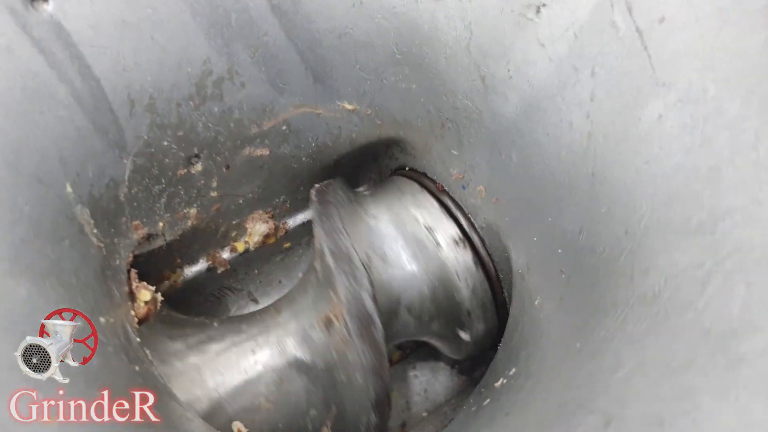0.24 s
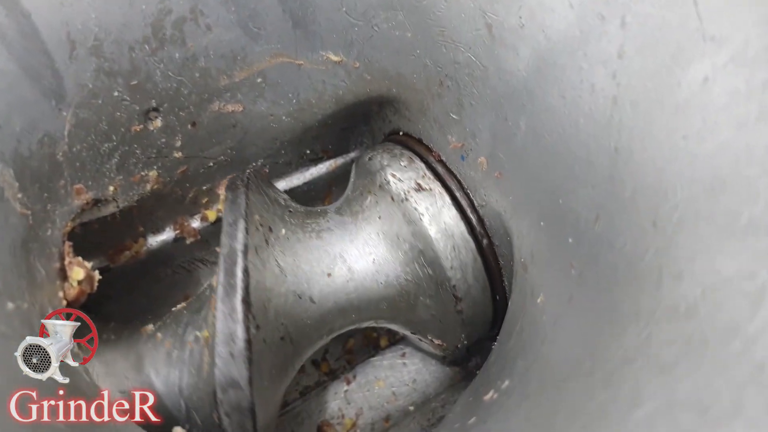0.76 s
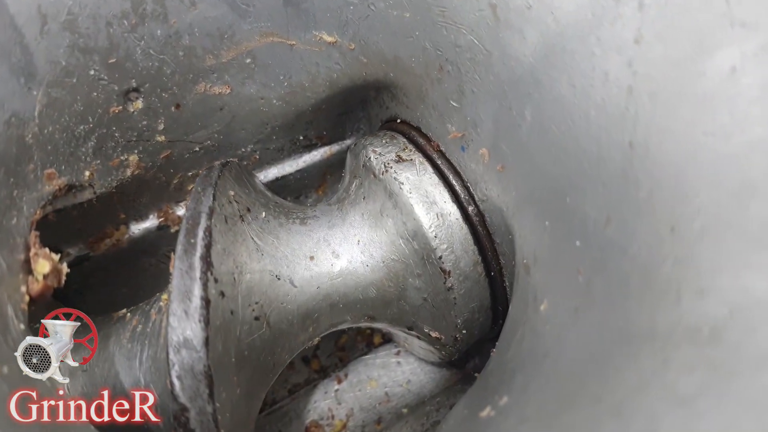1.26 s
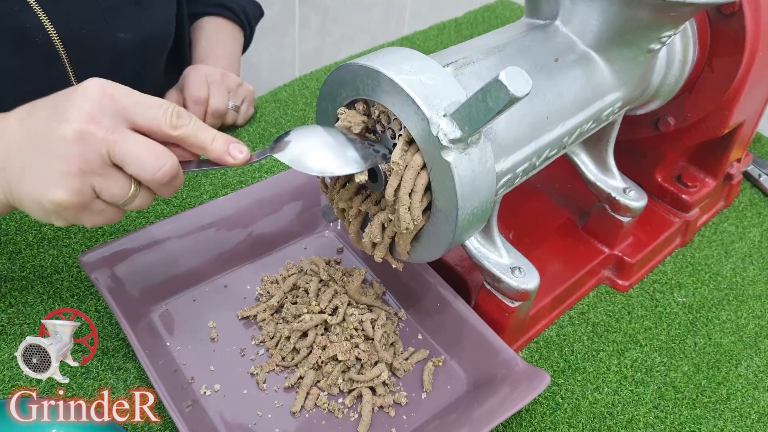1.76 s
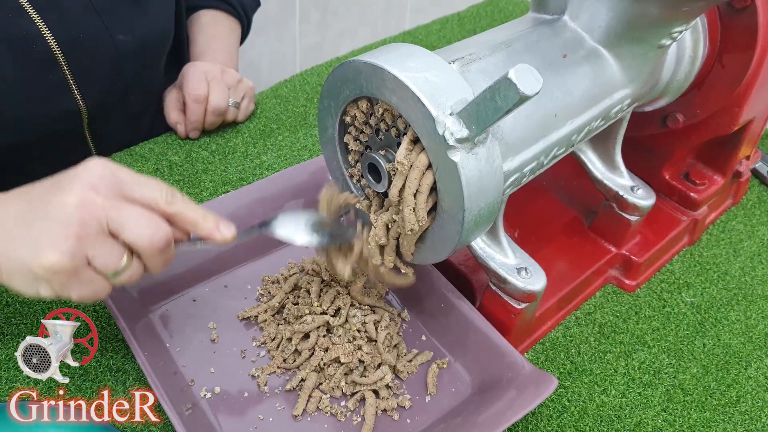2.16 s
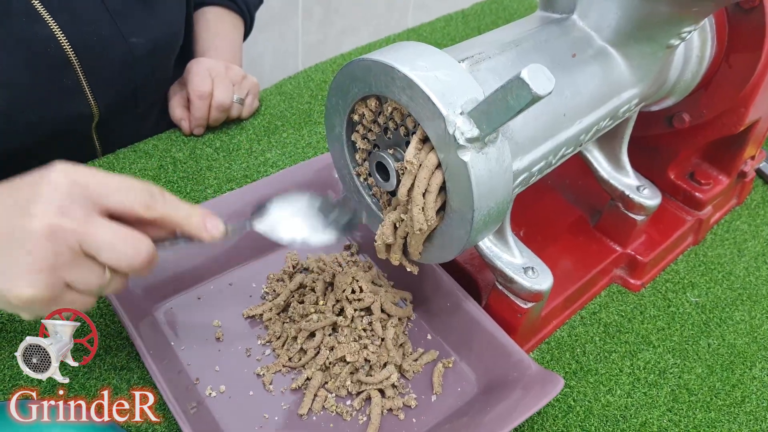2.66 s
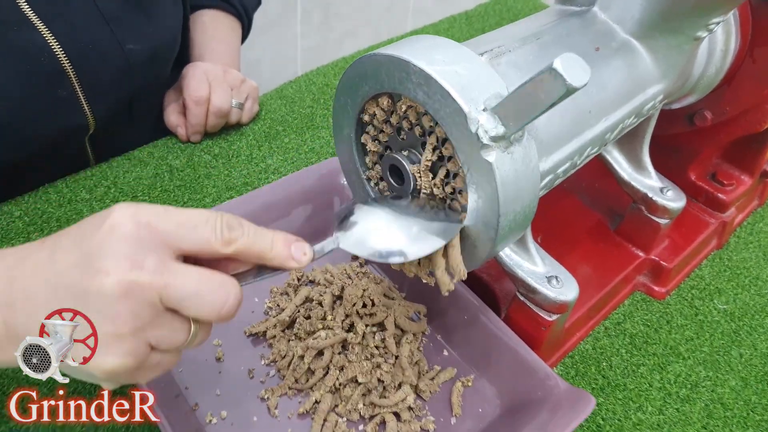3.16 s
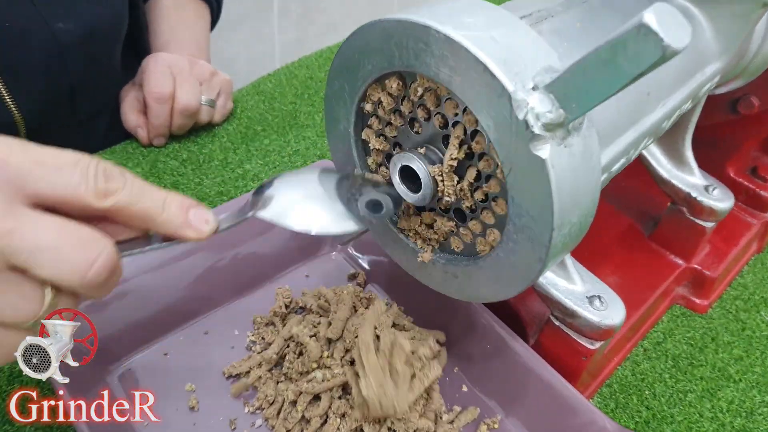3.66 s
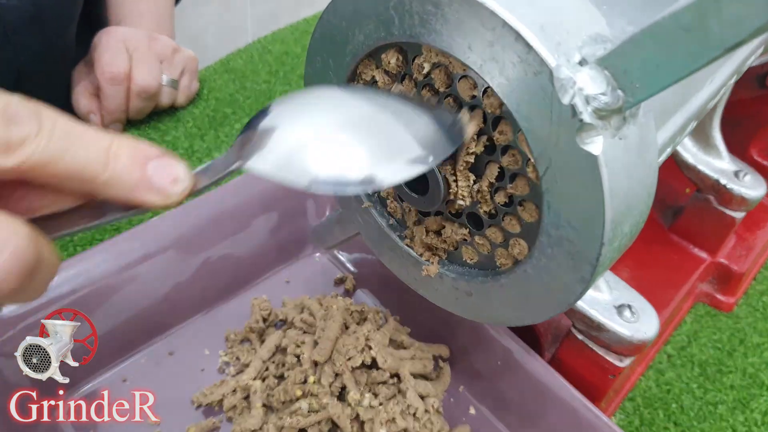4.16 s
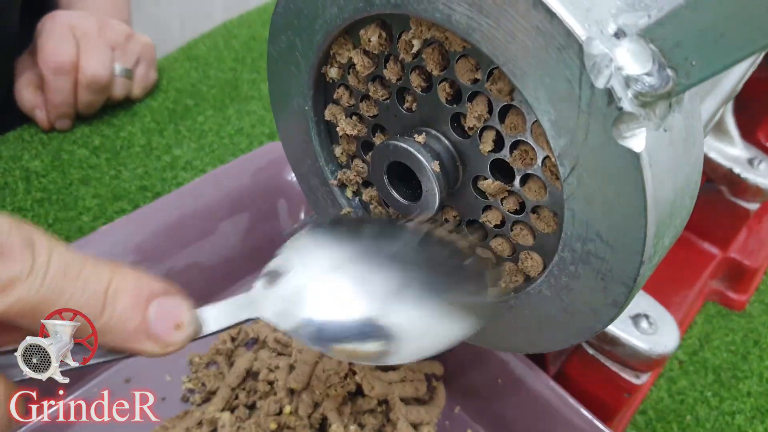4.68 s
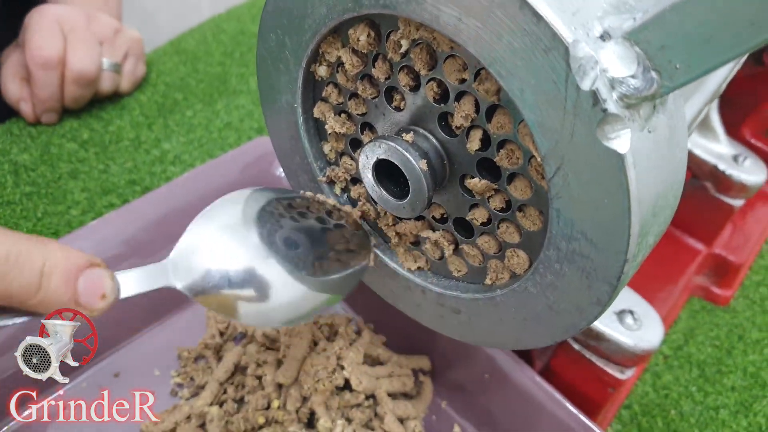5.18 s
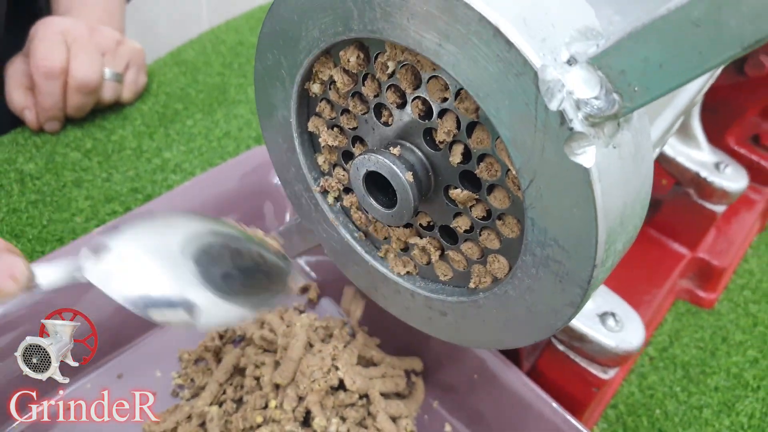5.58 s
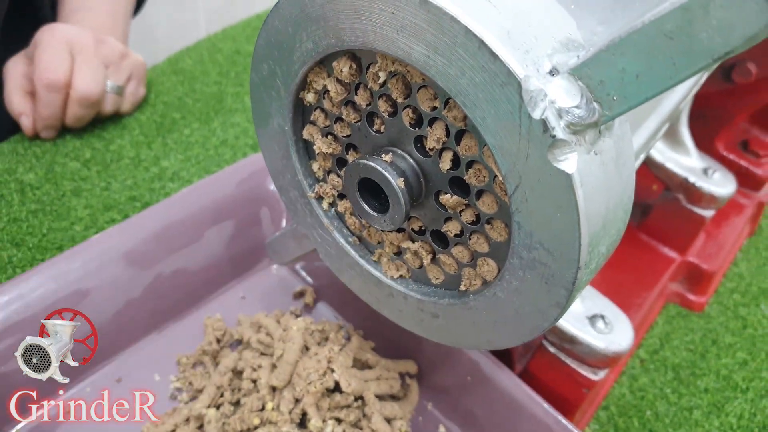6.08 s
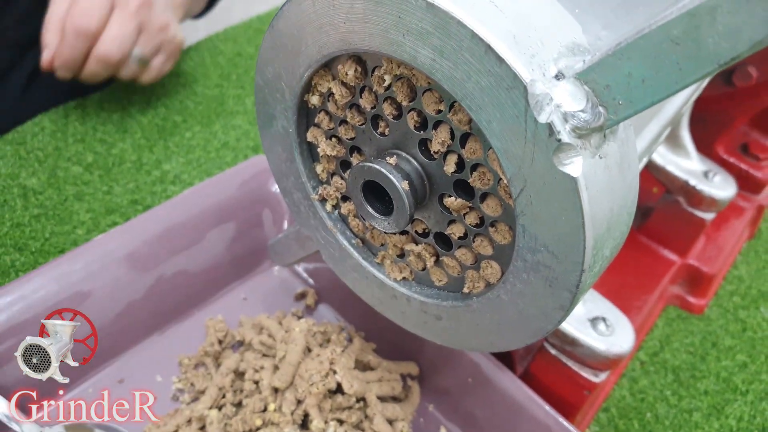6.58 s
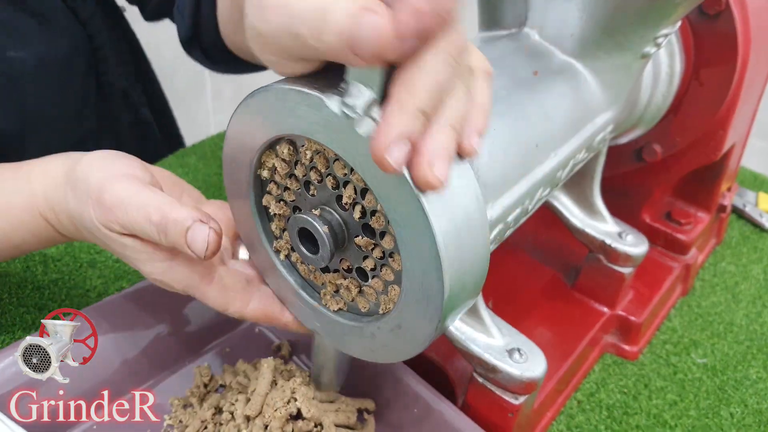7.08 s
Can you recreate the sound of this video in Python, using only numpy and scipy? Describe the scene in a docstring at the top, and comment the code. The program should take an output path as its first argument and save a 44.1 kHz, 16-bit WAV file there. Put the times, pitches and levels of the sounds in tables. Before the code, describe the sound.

Close stereo sound in a reverberant workshop, with faint steady air throughout. At 0 s a grinder's throbbing low hum and metallic rumble are running; a sharp clank at 0.2 s makes it bind louder, then from about 0.6 s the drive dies away, rubbing first, nearly silent by 1.5 s, where a tiny microphone click falls. An abrupt cut at 1.6 s starts a spoon on a steel plate: irregular gritty scrapes and bright ticks until 5.5 s, strongest at 2.5 and 4.35 s, the latter with a microphone thump. Low frame knocks follow some touches; from 4.5 s it sounds closer and drier. Soft sleeve rustling fills 6 to 6.6 s. At 6.57 s a hard double blow clangs brightly and chatters. After a cut at 6.78 s come dull booms, then a solid knock near 7.05 s and even, low thread grinding with hissing hand friction to the end.

```python
"""Meat grinder in a live workshop

Three abrupt shots: a cast-iron grinder's auger rumbles, clanks and runs down (hum, coloured grit, struck modes);
a spoon scrapes mince off the steel plate (bursts and strokes of grit) and the locking ring is struck loose (modes);
the ring is unscrewed (even grit under a juddering hiss of the hand).
Booms of the frame, soft rubs and sleeve sweeps, microphone bumps and air run across the cuts."""
import sys
import numpy as np
from scipy import signal
from scipy.fft import rfft, irfft, next_fast_len
from scipy.io import wavfile

SR = 44100
rng = np.random.default_rng(int(sys.argv[2]) if len(sys.argv) > 2 else 0)


def unload_wav(signal):
    """Save mono or channel-first audio to the path in sys.argv[1] as 16-bit WAV at rate SR, clipped to [-1, 1]."""
    wavfile.write(
        sys.argv[1],
        SR,
        np.round(np.clip(np.atleast_2d(signal).T, -1, 1) * 32767).astype(np.int16),
    )


N = 323253
T = np.arange(N) / SR


# auger hitting the barrel: (time [s], level [dB re clank_db], slide [ms])
CLANKS = [(0.182, -21.5, 3.2), (0.193, -16, 3), (0.203, -6.5, 0.92), (0.208, -10.5, 5.6),
          (0.354, -26.5, 2.2), (0.561, -23, 1.06)]
# screw modes: (frequency [Hz], t60 [s], relative level [dB], left minus right [dB])
AUGER_MODES = [(1130, 0.29, -9, 0), (1180, 0.89, -14.5, 0), (1986, 0.28, -22.5, -10),
               (2780, 0.032, -20.5, -16), (2977, 0.17, -13.5, 3), (5540, 0.046, -11.5, -1.5),
               (6560, .03, -1, -26), (6534, 0.07, -2, -20), (7320, 0.066, -19, -21.5), (6760, .02, -2, -9),
               (8350, 0.023, -10.5, -11), (9300, 0.09, -6.5, 8.5), (11750, 0.073, -5.5, -4),
               (12890, .1, -3.5, -7), (13400, 0.076, -3.5, -17.5), (16500, .02, -6, -7.5)]
# auger binding in the barrel and working free: (time [s], extra load [dB re running load])
BINDS = [(0.215, 4), (0.58, -11)]
BIND_ATTACK_S, BIND_RELEASE_S = 0.025, 0.2
# rumble spectrum: (frequency [Hz], level [dB])
RUMBLE_COLOUR = [(60, -10), (150, -12), (210, 4), (275, -9), (333, 9), (400, -11.5), (470, -5.5),
                 (570, -19), (700, -13), (1000, -26), (1600, -39), (4000, -34.5)]
# levels at full speed and running load; the rub level is that of the force before its filters
RUMBLE_DB, RUB_FORCE_DB = -32, -42.5
RUMBLE_POWER, RUB_POWER = 1.7, 3.2  # exponents of speed: rubbing dies first


def auger(walls, wet_db=-3, whine_db=-3, clank_db=1):
    """The screw rumbles in the barrel, rubs on it and clanks against it; binding makes it louder."""
    load = 1
    for s, db in BINDS:
        load = load + undb(db) * envelope(s, s + BIND_ATTACK_S, BIND_ATTACK_S, BIND_RELEASE_S)
    rumble = unit_rms(colour(grit(N, 2, alike=0.75), RUMBLE_COLOUR))
    rumble = rumble * undb(RUMBLE_DB) * load * speed() ** RUMBLE_POWER
    # rubbing is a softer contact than a clank: less treble
    rub_colour = [(1200, -0.5), (2000, 8), (3000, 4.5), (6500, -4.5), (9000, -15.5), (14000, -13)]
    force = colour(grit(N, 5.7) * judder(70, 3.3), rub_colour)
    force = force * undb(RUB_FORCE_DB) * load * speed() ** RUB_POWER
    # steady rubbing favours the two lowest modes
    whine = undb(whine_db) * through(force[0], body(AUGER_MODES[:2], blur=0.015))
    for s, db, slide_ms in CLANKS:
        add(force, s - 1 / 20, sized(contact(slide_ms), db + clank_db, slide_ms))
    metal = through(force, body(AUGER_MODES, crack_db=-17, crack_s=0.01, blur=0.022)) + whine
    # weak between its modes
    metal = colour(metal, [(700, -5), (1150, -2.5), (1600, -10), (2000, 0), (3000, 5), (4200, -3.5), (5500, 0.5)])
    return hum() + rumble * pan(-1.3) + metal + undb(wet_db) * through(metal, walls)


HUM_DB, HUM_POWER = -28.5, 0.96  # level at the start; exponent of speed
HUM_SAG_DB_PER_S = 7.5  # until switch-off


def hum(low_hz=103.9, high_hz=119.6, low_db=-5):
    """Two close notes of the frame throb against each other and fade with the drive."""
    pair = np.cos(2 * np.pi * high_hz * T) + undb(low_db) * np.cos(2 * np.pi * low_hz * T)
    sagging_db = HUM_DB - HUM_SAG_DB_PER_S * np.minimum(T, SWITCH_OFF_S)
    level = undb(sagging_db) * speed() ** HUM_POWER
    return unit_rms(pair * judder(19, 2.9)) * level * pan(-4.5)


SWITCH_OFF_S, COAST_S = 0.59, 0.26  # drive off; time constant of its speed


def speed():
    """Speed of the drive as a share of full speed, decaying exponentially after switch-off."""
    return np.exp(-np.maximum(T - SWITCH_OFF_S, 0) / COAST_S)


# ticks and skids on the plate: (time [s], slide [ms], level [dB], resonance [Hz], brightness [dB])
TOUCHES = [(1.662, 0.26, -24, 2550, -4.5), (1.704, 11.3, -17.5, 3000, -1.5), (1.735, 7.6, -26, 2600, 2),
           (2.041, 22.5, -28.5, 3570, 3), (2.064, 2.2, -23, 2980, 6.5), (2.092, 7.8, -23, 2680, 1),
           (2.486, 2.7, -22.5, 3060, 1), (2.498, 0.81, -14.5, 2540, -3.5), (2.543, 0.11, 2, 4250, 7),
           (2.906, 2.2, -21.5, 3200, 1), (2.921, 1.7, -22, 2880, 1), (3.02, 0.81, -25.5, 3010, -5.5),
           (3.14, 19, -20.5, 5530, 0), (3.389, 1.2, -16.5, 3660, -4), (3.399, 3.7, -22.5, 3630, -2),
           (3.432, 1.8, -18, 2800, 0.5), (3.438, 0.86, -17, 4020, -2.5), (3.527, 1, -16, 4000, 0),
           (3.741, 0.61, -15, 3320, -1), (3.826, 1.9, -16.5, 2530, -9.5), (3.904, 7, -27, 4220, 1),
           (4.236, 1.04, -7, 5530, 3.5), (4.301, 0.26, -16.5, 5400, -6.5), (4.315, 3.7, -15, 5490, -0.5),
           (4.354, 0.46, 4, 5130, 9.5), (4.389, 4.9, -15.5, 3500, 5), (4.637, 1.76, -10.5, 3800, -2),
           (4.713, 7.9, -15, 3510, 1.5), (4.986, 1.9, -16, 2520, -5.5), (5.068, 1.4, -12.5, 4000, -1),
           (5.163, 13, -25, 2580, -0.5), (5.443, 0.96, -12.5, 6480, 0.5), (5.517, 5.4, -22.5, 2750, -1.5)]
# at brightness 0; brightness takes from the bass what it gives the treble
TOUCH_BASS_DB, TOUCH_TREBLE_DB = -2, -3
# spoon on plate: (frequency [Hz], level [dB])
SPOON_COLOUR = [(60, -42), (200, -13.5), (600, -6.5), (1100, -5), (1800, -3), (3000, 2), (4500, -2),
                (5600, -1), (7300, -3.5), (8500, -6), (13000, -3), (16000, 1.5)]
# bowl of the spoon: (frequency [Hz], t60 [s], relative level [dB], left minus right [dB])
SPOON_MODES = [(5470, 0.3, -2, -6), (7480, 0.31, -5, -3.5)]
# frame, undamped: (frequency [Hz], t60 [s], relative level [dB], left minus right [dB])
FRAME = [(100, 1.7, -10.5, -5.5), (116, 0.88, -2, -6.5), (153.6, 1.1, -7.5, -6), (209, 2.1, -2.5, -6),
         (227.8, 0.69, -3, -5), (309.4, 2, -4.5, -2.5), (343.6, 2.4, 1.5, -13.5), (358, 0.85, 0.5, -5),
         (403, 0.55, -10, 0.5), (459.4, 0.92, -5, 4.5)]
SPOON_PAN_DB, SPOON_LAG_MS = -5, 0.11  # left minus right; right is late
# the microphone creeps closer, so less room and frame are heard
APPROACH_START_S, APPROACH_END_S = 4.47, 4.67
SPREAD_FAR_DB, SPREAD_NEAR_DB = -6, -13.5


def spoon(walls, frame_db=-4, ring_db=-17, damping=0.71):
    """Ticks and short skids joined by gritty strokes; where the spoon touches decides its resonance."""
    steel = strokes()
    for s, slide_ms, db, hz, bright_db in TOUCHES:
        burst = colour(contact(slide_ms), SPOON_COLOUR)
        burst = colour(burst, [(900, TOUCH_BASS_DB), (2000, 0), (6500, 0), (10000, TOUCH_TREBLE_DB)])
        burst = resonate(brighten(burst, bright_db), hz, width_hz=700, db=3)
        add(steel, s - 1 / 20, sized(burst, db, slide_ms))
    late_right = np.roll(steel[1], round(SPOON_LAG_MS * SR / 1000))
    direct = pan(SPOON_PAN_DB) * np.array([steel[0], late_right])
    ring = undb(ring_db) * through(steel.mean(0), body(SPOON_MODES, blur=0.012))
    # touches reach the room and the frame, which the packed mince damps
    spread_db = np.interp(T, [APPROACH_START_S, APPROACH_END_S], [SPREAD_FAR_DB, SPREAD_NEAR_DB])
    spread = steel.mean(0) * undb(spread_db)
    frame = body([(hz, t60 * damping, db, lr) for hz, t60, db, lr in FRAME], blur=0.068)
    surroundings = pan(-3.5) * np.sqrt(2) * walls + undb(frame_db) * frame
    return direct + ring + through(spread, surroundings)


# spoon dragged across the plate: (start [s], end [s], level [dB], resonance [Hz], brightness [dB])
STROKES = [(1.615, 1.756, -35, 2140, -0.5), (2.015, 2.069, -39, 3380, 11.5), (2.091, 2.15, -30.5, 1850, -1),
           (2.482, 2.532, -31.5, 2600, 1), (2.55, 2.628, -26, 3340, 0.5), (2.905, 2.974, -37.5, 2780, -2.5),
           (3.105, 3.52, -31.5, 2180, 2), (3.815, 3.94, -42, 2710, 3.5), (4.232, 4.42, -35.5, 5400, 2.5),
           (4.965, 5.169, -33.5, 2550, -2), (5.41, 5.497, -30.5, 2770, 1)]
STROKE_ATTACK_S, STROKE_RELEASE_S = 0.0088, 0.024


def strokes():
    """The spoon drags through the mince: dense slips and cracks, with a quick attack and release."""
    slips = grit(N, 3.04, alike=0.24) * judder(220, 5) * judder(60, 2.9)
    slips = colour(slips + crumbs(), SPOON_COLOUR)
    slips = colour(slips, [(500, 5.5), (3000, 1.5), (6000, -3), (9000, -5.5), (15000, -4)])
    out = np.zeros((2, N))
    for start, end, db, hz, bright_db in STROKES:
        span = slice(int(start * SR), int(end * SR) + SR // 20)
        drag = resonate(brighten(slips[:, span], bright_db), hz, width_hz=650, db=1)
        swell = envelope(start, end, STROKE_ATTACK_S, STROKE_RELEASE_S)[span]
        add(out, start, undb(db) * unit_rms(drag) * swell)
    return out


CRUMBS_PER_S, CRUMB_DB = 180, -9.5  # level re the slips


def crumbs():
    """Crumbs of mince crack under the spoon: sparse impulses of uneven size."""
    cracks = (rng.random(N) < CRUMBS_PER_S / SR) * rng.standard_normal((2, N))
    return undb(CRUMB_DB) * unit_rms(cracks)


# ring struck by its handle: (time [s], level [dB])
RING_BLOWS = [(6.5734, -2.5), (6.607, -2.5), (6.613, -20), (6.654, -22)]
# ring modes: (frequency [Hz], t60 [s], relative level [dB], left minus right [dB])
RING_MODES = [(816, 0.37, -13.5, 2.5), (1130, 0.27, -17.5, -3), (1392, 1, -25.5, -4), (1836, 0.37, -16, 17),
              (1992, 0.21, -4.5, -20), (2300, 0.21, -20, 12), (2440, 0.45, -18.5, -7), (2860, 0.15, -27, 0),
              (3400, .2, -31, -2), (2630, 0.17, -15, -16), (2800, 0.089, -21, -19), (3440, 0.19, -21, -8),
              (3840, 0.099, -11, -10), (3873, 0.16, -12, 11), (4280, 0.62, -17, -2), (4810, 0.38, -5, -1),
              (5170, 0.24, -4.5, -21), (5400, 0.17, -26, -11), (5540, 0.32, -6.5, -6),
              (6260, .15, -2.5, -31.5), (5940, 0.15, 7, -27), (7150, 0.5, -12.5, -13), (8550, 0.18, -9, -7),
              (9440, 0.22, -3, -23), (11170, 0.18, -4.5, 1), (11700, 0.18, -12, -10),
              (12240, 0.095, -1.5, -17), (13800, 0.11, -7.5, -18), (14100, .18, -26, -1),
              (15600, .15, -33, -4)]


def locking_ring(walls, wet_db=-5, chatter_db=-21, chatter_s=0.07):
    """Two hard blows and a few lighter ones make the heavy ring clang and chatter on its thread."""
    force = np.zeros(N)
    for s, db in RING_BLOWS:
        force[int(s * SR)] += undb(db) * np.sqrt(SR / 100)  # rms over 10 ms
    clang = through(force, body(RING_MODES, crack_db=-12, crack_s=0.02, blur=0.0046))
    struck = RING_BLOWS[0][0]
    chatter_colour = [(400, -14), (900, -4.5), (2200, 5), (5500, 0), (8000, -12), (14000, -16)]
    chatter = unit_rms(colour(grit(N, 2.56) * judder(300, 5.8), chatter_colour))
    clang = clang + undb(chatter_db) * pan(-2) * chatter * envelope(struck, struck, 0.0024, chatter_s)
    to_room = colour(clang, [(800, -5.5), (3000, 8), (6000, -10), (15000, -2)])
    return clang + undb(wet_db) * through(to_room, walls)


# ring on its thread: (frequency [Hz], level [dB])
THREAD_COLOUR = [(35, -55), (60, -31.5), (108, -16), (176, -3.5), (222, 6), (256, 1), (338, -8.5),
                 (389, -1.5), (1090, -15), (2350, -13.5), (6900, -27), (9570, -59), (13300, -41),
                 (16000, -39)]
TURN_S, TURN_DB, TURN_ATTACK_S = 7.046, -34, 0.012
JOLT_DB, JOLT_S = 0, 0.044  # re the turn; decay time constant
HAND_S, HAND_ATTACK_S, HAND_DB = 7.015, 0.028, -38  # level before colour


def thread(walls, wet_db=-4, frame_db=-1):
    """The ring jolts free, grinds round evenly and keeps the frame booming; the hand hisses over it."""
    jolt = undb(JOLT_DB) * envelope(TURN_S, TURN_S + TURN_ATTACK_S, TURN_ATTACK_S, JOLT_S)
    effort = undb(TURN_DB) * (np.clip((T - TURN_S) / TURN_ATTACK_S, 0, 1) + jolt)
    slips = grit(N, 2.75, alike=0.78)
    rub = unit_rms(colour(slips, THREAD_COLOUR)) * effort * pan(-3)
    grip = undb(HAND_DB) * np.clip((T - HAND_S) / HAND_ATTACK_S, 0, 1)
    hand = colour(grit(N, 1.3, alike=0.1) * judder(70, 2.4), SLEEVE_COLOUR) * grip * pan(-10)
    boom = undb(frame_db) * through(slips[0] * effort, body(FRAME))
    return rub + hand + undb(wet_db) * through(rub, walls) + boom


# knocks and booms of the frame: (time [s], level [dB before colour], contact [ms])
KNOCKS = [(1.72, -38, 0.95), (2.1, -39.5, 0.55), (2.559, -27, 0.46), (2.922, -33, 0.26),
          (3.826, -23.5, 0.8), (4.353, -29.5, 0.6), (4.987, -40, 0.71), (6.575, -26, 11), (6.776, -20, 27),
          (6.85, -21.5, 27), (7.059, -15, 0.96)]


def knocks():
    """Dull knocks and booms of the frame; the longer the contact, the deeper."""
    out = np.zeros((2, N))
    for s, db, contact_ms in KNOCKS:
        modes = []
        for hz, t60, mode_db, lr in FRAME:
            spot_db = 2 * rng.standard_normal()  # each favours other modes
            softness_db = 20 * np.log10(1 + (hz * contact_ms / 700) ** 2)
            modes.append((hz, t60, mode_db + spot_db - softness_db, lr))
        add(out, s, undb(db) * np.sqrt(SR / 100) * body(modes))  # rms over 10 ms
    return colour(out, [(40, -5), (100, 1.5)])


# soft rubs and sweeps of the sleeve: (start [s], end [s], peak level [dB before colour])
RUSTLES = [(1.406, 1.616, -63.5), (5.953, 6.644, -44), (6.676, 7.047, -48)]
# soft rubbing: (frequency [Hz], level [dB])
SLEEVE_COLOUR = [(100, 1), (400, 6.5), (1000, -3), (3000, 3), (5000, 1.5), (7000, 6.5), (9000, -2),
                 (14000, 3), (16000, -2)]


def sleeve(frame_db=-13):
    """Soft rubs and sweeps of the sleeve: juddering grit in smooth swells, which also stirs the frame."""
    sweeps = np.zeros(N)
    for start, end, db in RUSTLES:
        sweeps += undb(db) * np.sin(np.pi * np.clip((T - start) / (end - start), 0, 1))
    slips = grit(N, 1.3, alike=0.14) * judder(70, 2.4) * sweeps
    rustle = colour(slips, SLEEVE_COLOUR) * pan(-6)
    return rustle + undb(frame_db) * through(slips[0], body(FRAME[:2]))


# clicks and thumps on the microphone's case: (time [s], level [dB])
CLICKS = [(1.482, -27), (1.532, -44)]
THUMPS = [(2.546, -44), (4.355, -14.5), (6.573, -52), (7.056, -39)]
# case modes: (frequency [Hz], t60 [s], relative level [dB], left minus right [dB])
CLICK_MODES = [(835, 0.014, -5, -41), (3140, 0.004, 3, -41)]
THUMP_MODES = [(60, 0.09, 0.5, 7), (85.9, 0.07, -2.5, 0)]


def bumps(events, modes):
    """Decaying case modes right at the microphone, too close to stir the room."""
    out, t = np.zeros((2, N)), T[:SR // 2]
    case = 0
    for hz, t60, db, lr in modes:
        case = case + undb(db) * pan(lr) * np.sin(2 * np.pi * hz * t) * decay(t, t60)
    for s, db in events:
        add(out, s, undb(db) * case)
    return out


# reverberation: (frequency [Hz], t60 [s])
ROOM_T60 = [(150, 1.1), (400, 0.78), (1000, 0.61), (2800, 0.62), (7000, 0.56), (15000, 0.24)]


def room(build_s=0.0016):
    """Impulse response of the workshop: octave bands of noise; the treble dies first."""
    t, tail = T[:SR], 0
    spectrum, f = rfft(rng.standard_normal((2, SR))), np.fft.rfftfreq(SR, 1 / SR)
    for hz in 125 * 2 ** np.arange(8):
        band = np.clip(1 - abs(np.log2((f + 1) / hz)), 0, 1)
        tail = tail + irfft(spectrum * band, SR) * decay(t, on_log(hz, ROOM_T60))
    tail = colour(tail, [(200, 4.5), (1000, 6), (3000, 2.5), (7000, -2), (15000, 1.6)])
    return unit_energy(tail * (1 - np.exp(-t / build_s)))


# background air: (frequency [Hz], level [dB])
AIR_COLOUR = [(25, -17), (60, 4), (120, 1), (210, 0), (270, -15.5), (345, -0.5), (840, -27.5), (4300, -35),
              (6400, -21), (9700, -29.5), (13300, -21.5), (16000, -35)]
AIR_DB = -59.5


def air():
    """Steady coloured noise, partly alike left and right."""
    return unit_rms(colour(grit(N, 0, alike=0.23), AIR_COLOUR)) * undb(AIR_DB)


def grit(n, spread_db, alike=0.45):
    """Dense tiny slips, their unevenness set by spread_db, partly alike left and right."""
    sizes = np.minimum(rng.exponential(size=n // 16 + 1), 5)
    size = undb(spread_db * np.repeat(sizes, 16)[:n])
    common, own = rng.standard_normal(n), rng.standard_normal((2, n))
    return unit_rms(size * (np.sqrt(alike) * common + np.sqrt(1 - alike) * own))


def judder(rate_hz, depth_db):
    """Gain of a contact that catches and lets go at uneven moments."""
    moments = np.cumsum(rng.exponential(1 / rate_hz, size=4000))
    grips = np.clip(rng.standard_normal(len(moments)), -2, 2)
    return unit_rms(undb(depth_db * np.interp(T, moments, grips)))


def contact(slide_ms, spread_db=0.5, ring_ms=0.87):
    """A burst of slips that swells and fades, its peak in the middle of a 0.1 s frame."""
    ms = (T[:SR // 10] - 1 / 20) * 1000
    swell = np.exp(np.minimum(ms / (0.58 * slide_ms), -ms / (0.7 * slide_ms + ring_ms)))
    return grit(len(ms), spread_db, alike=0.082) * swell


def sized(x, db, slide_ms):
    """Give a burst its level over the time that the contact lasts."""
    return unit_energy(x) * undb(db) * np.sqrt(SR * (2 * slide_ms + 4) / 1000)


def body(modes, crack_db=-60, crack_s=0.01, blur=0):
    """Impulse response of a metal part: modes that a loose seat blurs, and a crack of countless weak ones."""
    t, ring = T[:SR], 0
    for hz, t60, db, lr in modes:
        wander = 0
        if blur:  # random phase walk: line width = blur * hz
            steps = rng.standard_normal((2, SR))
            wander = np.cumsum(steps, axis=1) * np.sqrt(2 * np.pi * blur * hz / SR)
        mode = np.sin(2 * np.pi * hz * t + wander) * decay(t, t60)
        ring = ring + undb(db) * pan(lr) * unit_energy(mode)
    crack_colour = [(200, -16.5), (700, -11), (2000, -7.5), (6000, -3.5), (8000, -8.5), (15000, -0.5)]
    crack = colour(rng.standard_normal((2, SR)) * np.exp(-t / crack_s), crack_colour)
    return unit_energy(unit_energy(ring) + undb(crack_db) * pan(1) * unit_energy(crack))


def decay(t, t60):
    """Exponential decay by 60 dB in t60 seconds."""
    return np.exp(-np.log(1000) * t / t60)


def envelope(start, end, attack_s, release_s):
    """Rise from the start, hold until the end, then die away."""
    return np.clip((T - start) / attack_s, 0, 1) * np.exp(-np.clip((T - end) / release_s, 0, 20))


def resonate(x, hz, width_hz, db):
    """Add one damped resonance to a sound."""
    return x + undb(db) * signal.lfilter(*signal.iirpeak(hz, hz / width_hz, fs=SR), x)


def brighten(x, db):
    """A sharper contact has more treble and less bass."""
    return colour(x, [(900, -db), (2000, 0), (6500, 0), (10000, db)])


def colour(x, points):
    """Filter by a spectrum of (frequency [Hz], level [dB]) points."""
    n = next_fast_len(x.shape[-1])
    gain = undb(on_log(np.fft.rfftfreq(n, 1 / SR), points))
    return irfft(rfft(x, n) * gain, n)[..., :x.shape[-1]]


def on_log(hz, points):
    """Read (frequency [Hz], value) points on a log-frequency axis."""
    f, value = np.transpose(points)
    return np.interp(np.log(hz + 1), np.log(f), value)


def through(x, response):
    """Pass a signal through a stereo impulse response."""
    return signal.fftconvolve(np.atleast_2d(x), faded(response), axes=-1)[:, :N]


def faded(response):
    """Close a one-second impulse response gently."""
    return response * np.clip(10 * (1 - T[:SR]), 0, 1) ** 2


def add(out, s, x):
    """Mix a short sound in at time s."""
    i = max(int(s * SR), 0)
    out[..., i:i + x.shape[-1]] += x[..., :N - i]


def undb(db):
    """Decibels to gain."""
    return 10 ** (np.asarray(db) / 20)


def pan(db):
    """Left and right gains of constant power, db apart."""
    g = undb(np.array([[db], [-db]]) / 2)
    return g / np.sqrt(np.mean(g ** 2))


def unit_rms(x):
    """Scale to rms 1."""
    return x / np.sqrt(np.mean(x ** 2))


def unit_energy(x):
    """Scale to a mean energy of 1 per channel."""
    return unit_rms(x) / np.sqrt(x.shape[-1])


# cuts between the three shots: time [s]
CUTS = [1.622, 6.775]


def scene():
    """Main sources are cut off abruptly between shots; knocks, bumps, sleeve and air run across the cuts."""
    walls = room()
    first, last = T < CUTS[0], T >= CUTS[1]
    middle = ~first & ~last
    shots = first * auger(walls)
    shots = shots + middle * (spoon(walls) + locking_ring(walls))
    shots = shots + last * thread(walls)
    case = bumps(CLICKS, CLICK_MODES) + bumps(THUMPS, THUMP_MODES)
    return shots + knocks() + sleeve() + case + air()


# microphone response: (frequency [Hz], level [dB])
MICROPHONE = [(20, -21), (60, -3.5), (8000, -2), (9300, -7), (10200, -12.5), (11500, -5), (13000, -2)]
TOP_HZ = 15900


def record(dry):
    """The microphone has a notch in the treble; peaks limit hard at full scale and the top is cut."""
    loud = np.clip(colour(dry, MICROPHONE), -1, 1)
    low_pass = signal.ellip(10, 0.2, 70, TOP_HZ, fs=SR, output="sos")
    return signal.sosfilt(low_pass, loud)


dry = scene()
out = record(dry)
unload_wav(out)
```